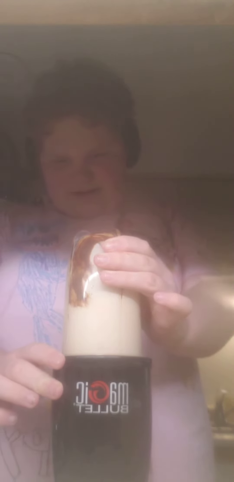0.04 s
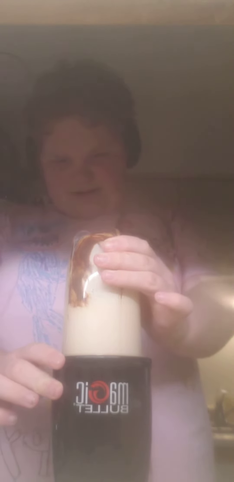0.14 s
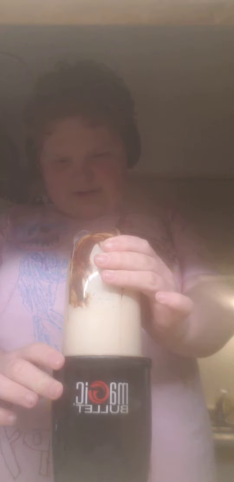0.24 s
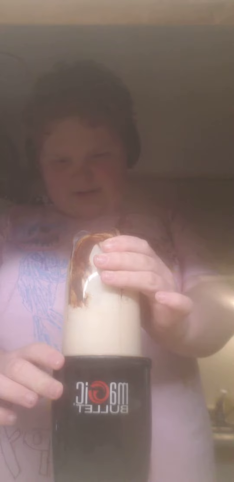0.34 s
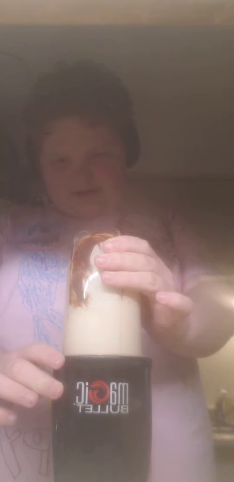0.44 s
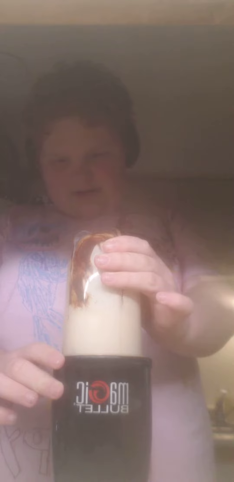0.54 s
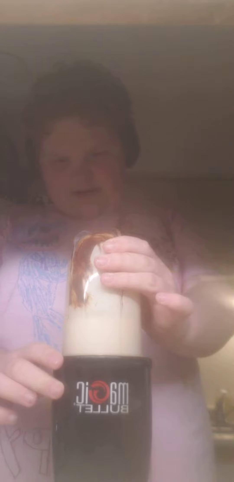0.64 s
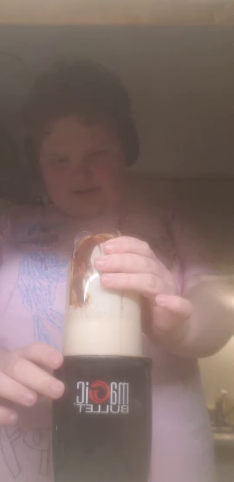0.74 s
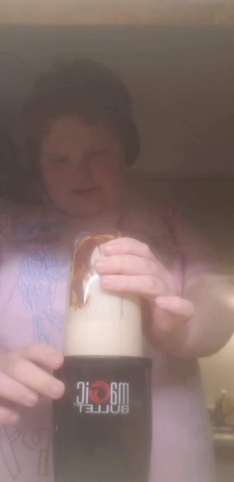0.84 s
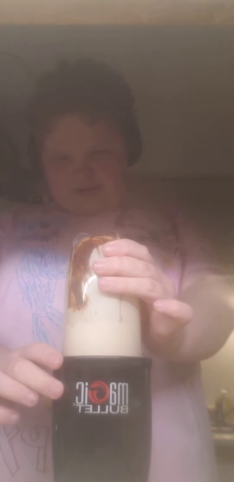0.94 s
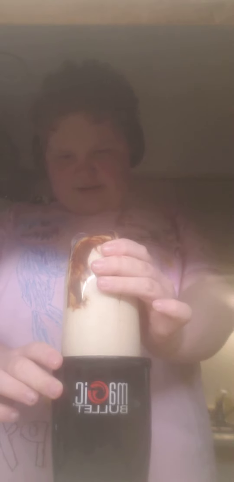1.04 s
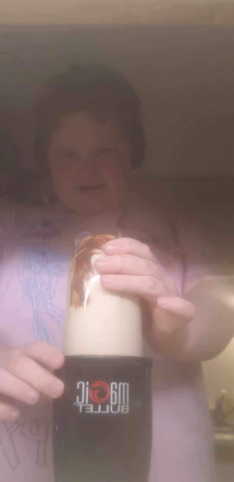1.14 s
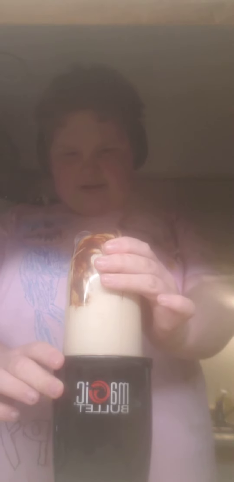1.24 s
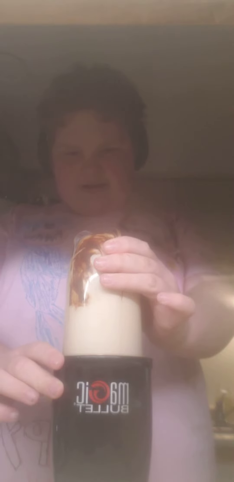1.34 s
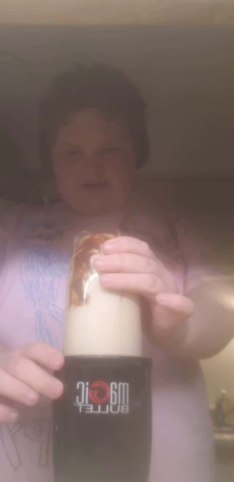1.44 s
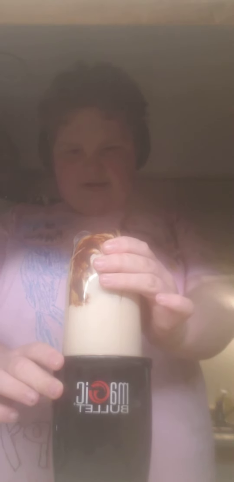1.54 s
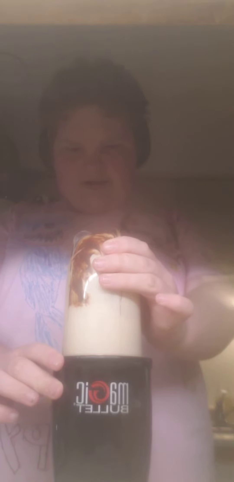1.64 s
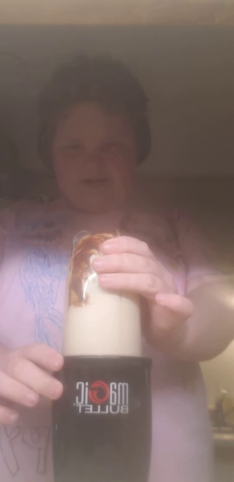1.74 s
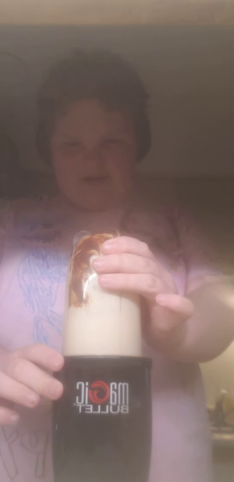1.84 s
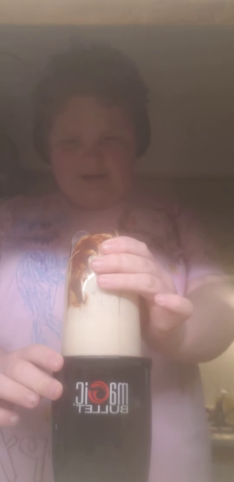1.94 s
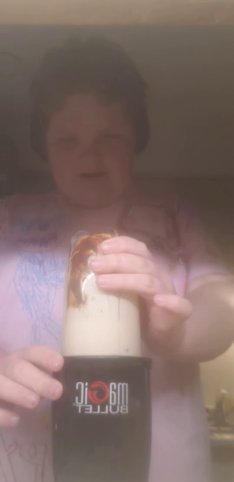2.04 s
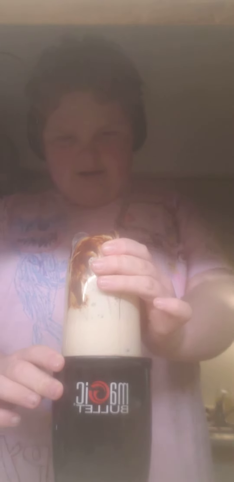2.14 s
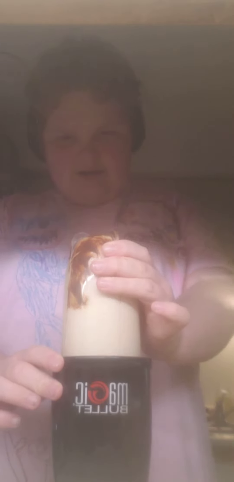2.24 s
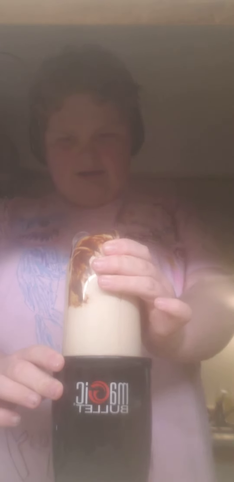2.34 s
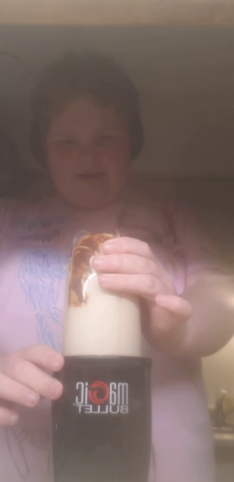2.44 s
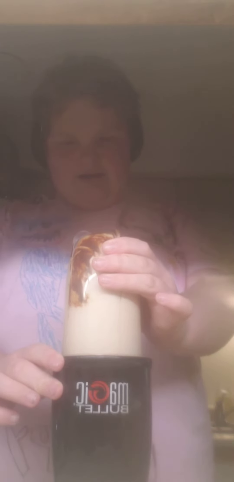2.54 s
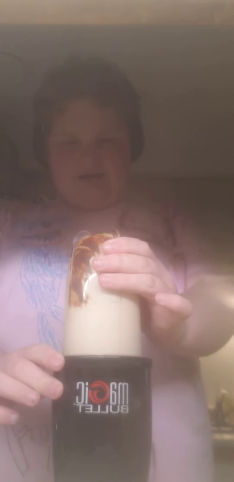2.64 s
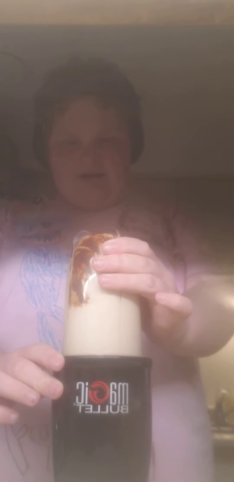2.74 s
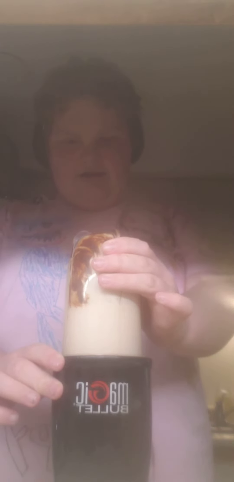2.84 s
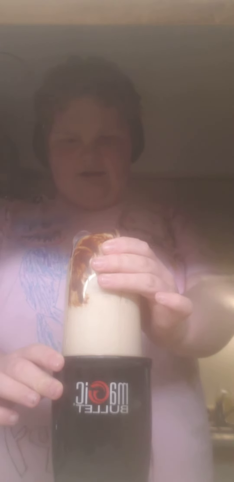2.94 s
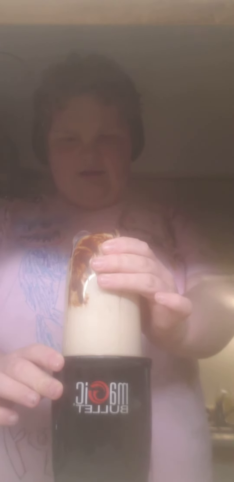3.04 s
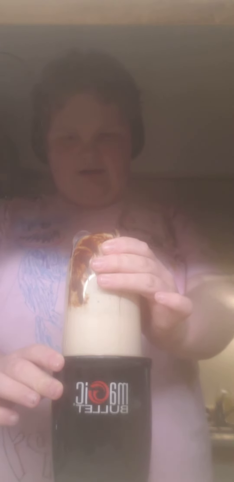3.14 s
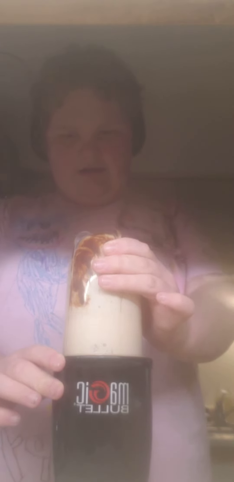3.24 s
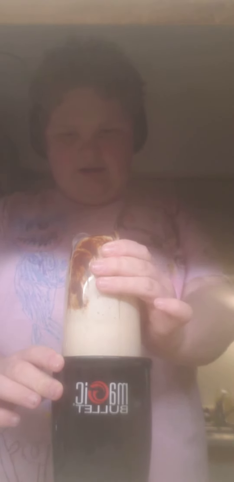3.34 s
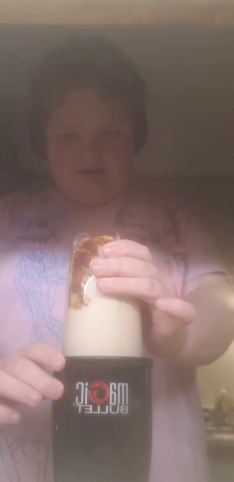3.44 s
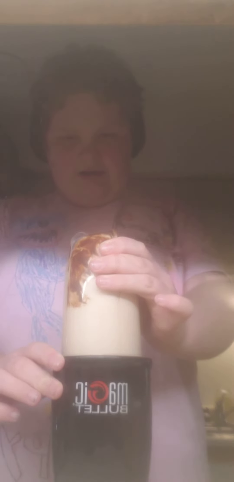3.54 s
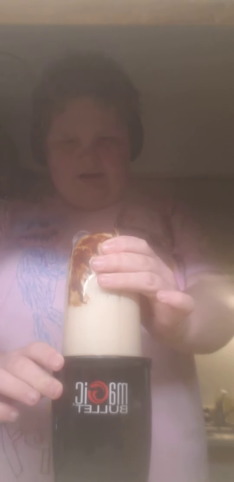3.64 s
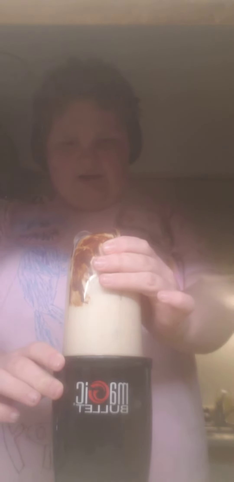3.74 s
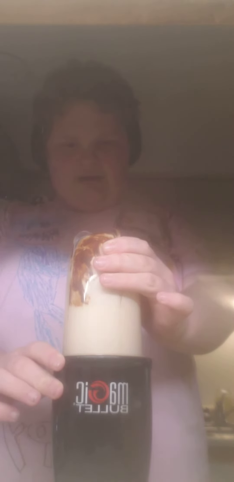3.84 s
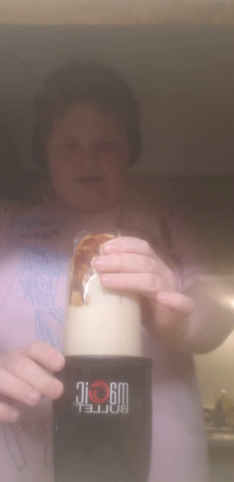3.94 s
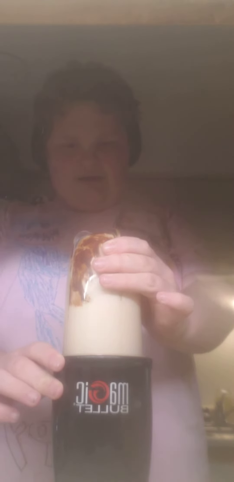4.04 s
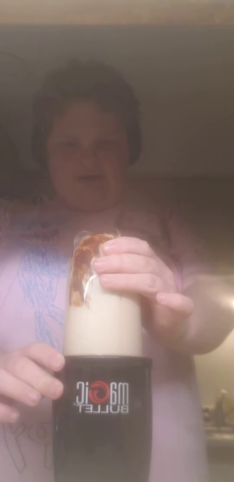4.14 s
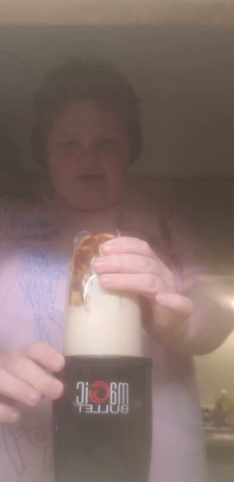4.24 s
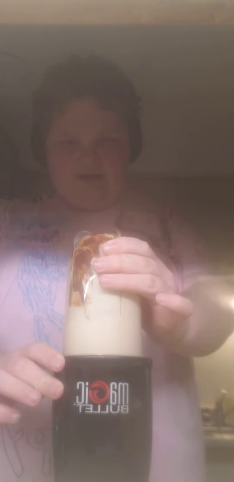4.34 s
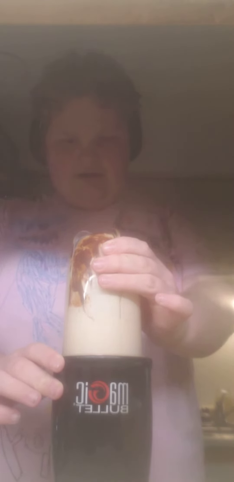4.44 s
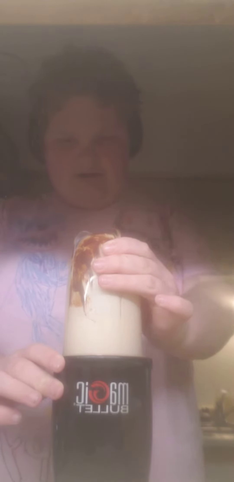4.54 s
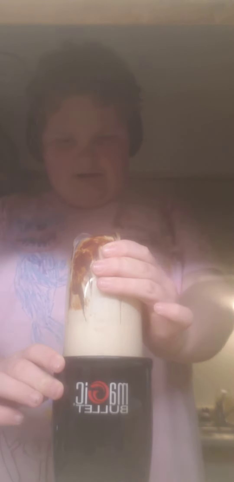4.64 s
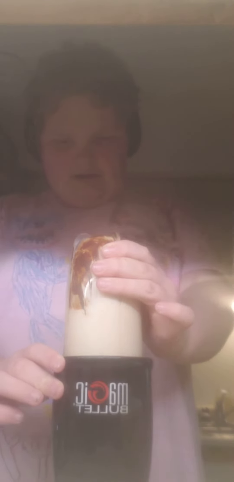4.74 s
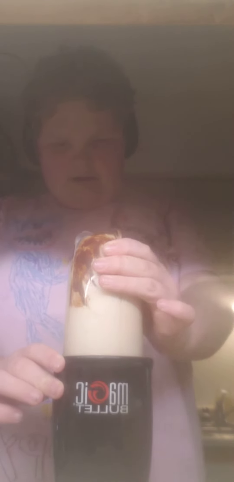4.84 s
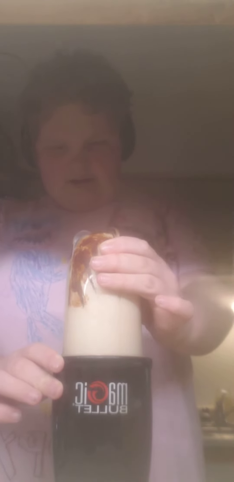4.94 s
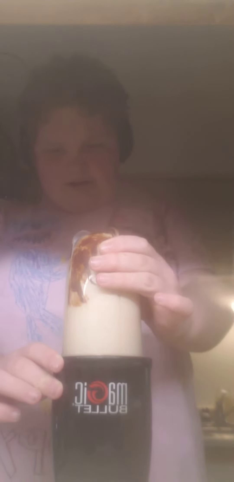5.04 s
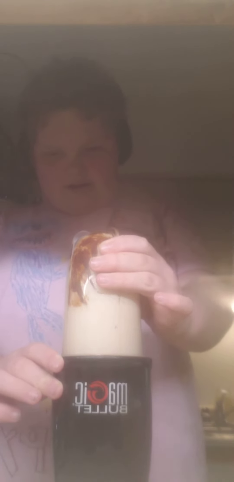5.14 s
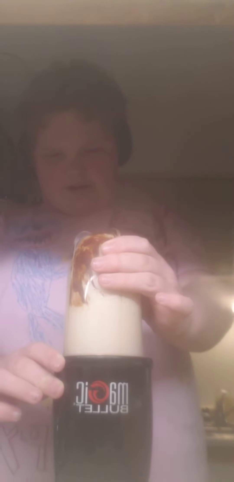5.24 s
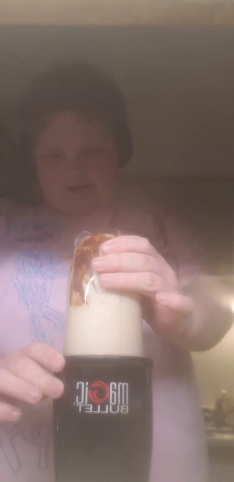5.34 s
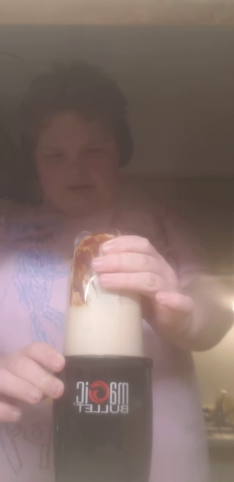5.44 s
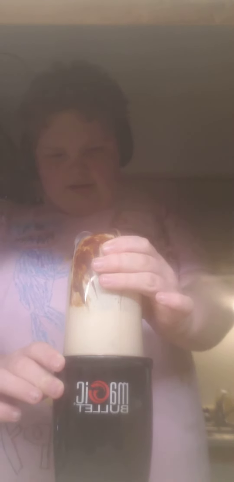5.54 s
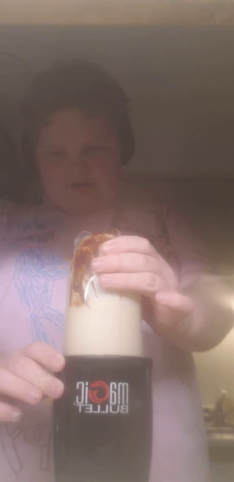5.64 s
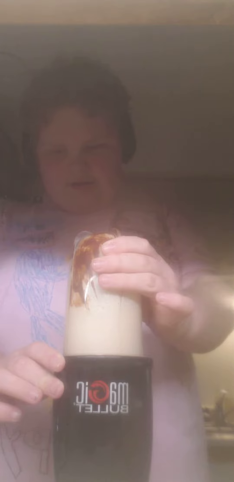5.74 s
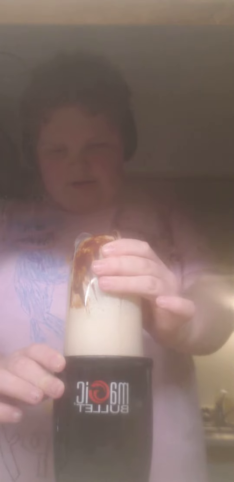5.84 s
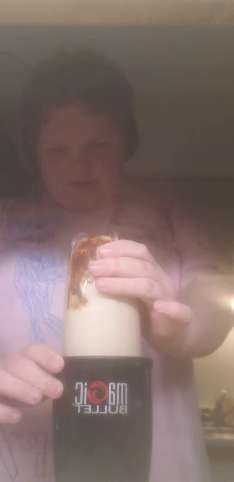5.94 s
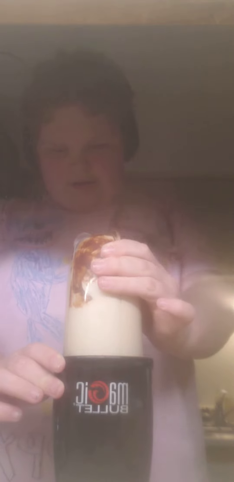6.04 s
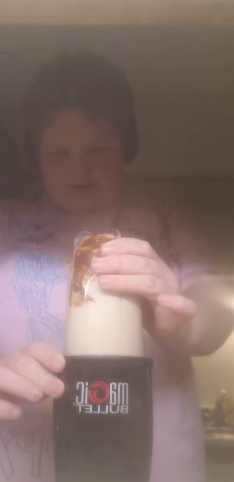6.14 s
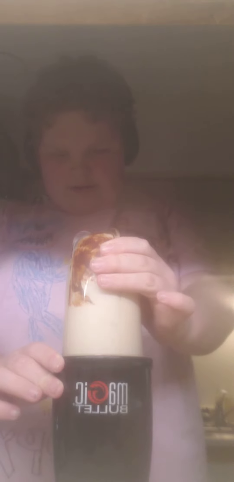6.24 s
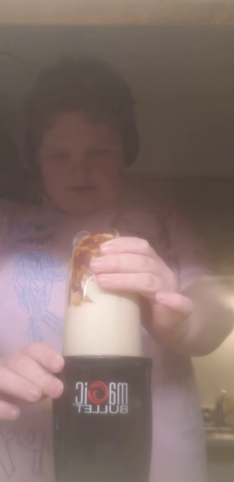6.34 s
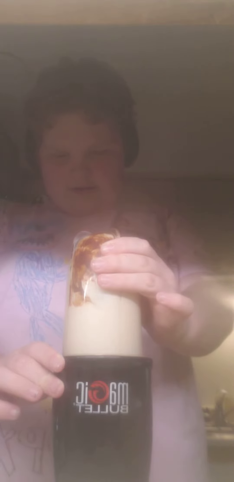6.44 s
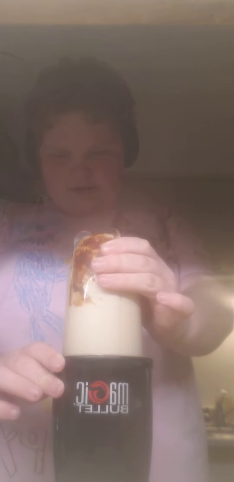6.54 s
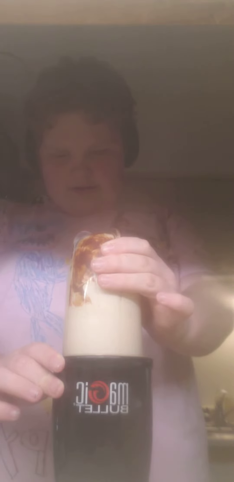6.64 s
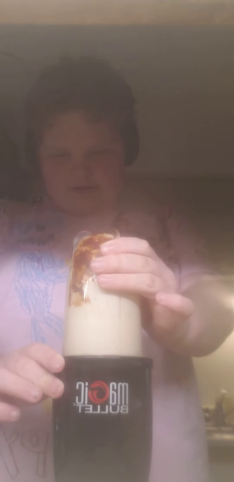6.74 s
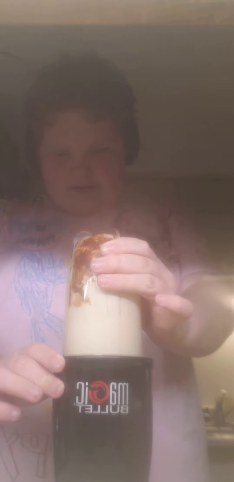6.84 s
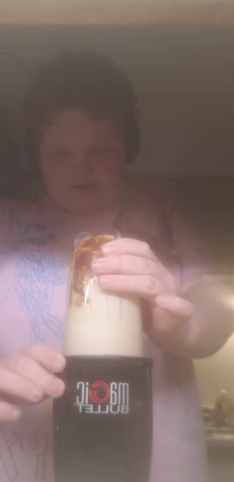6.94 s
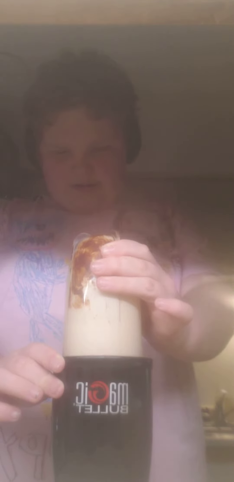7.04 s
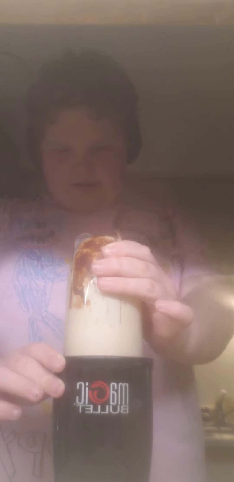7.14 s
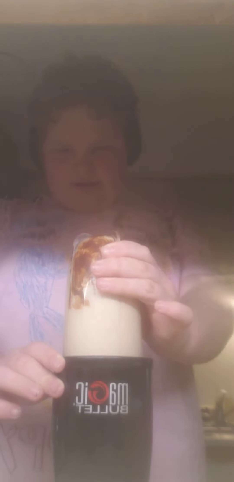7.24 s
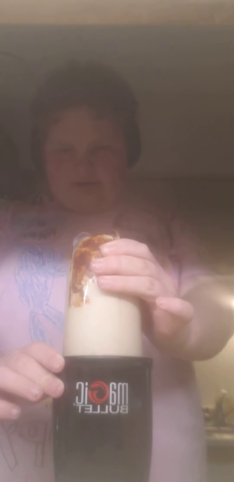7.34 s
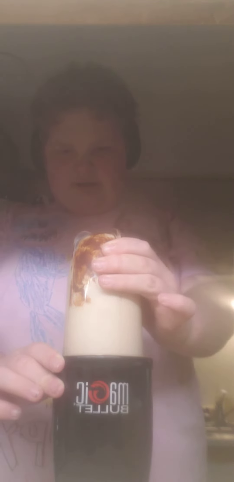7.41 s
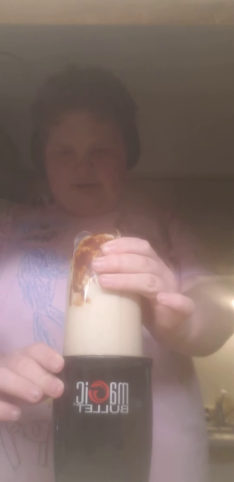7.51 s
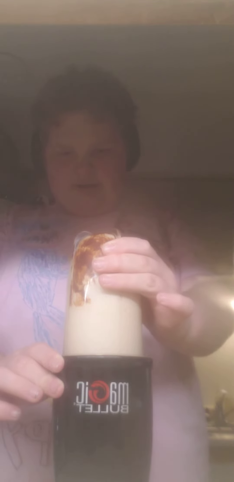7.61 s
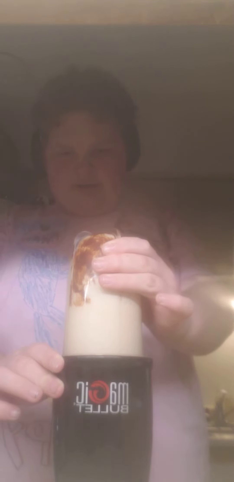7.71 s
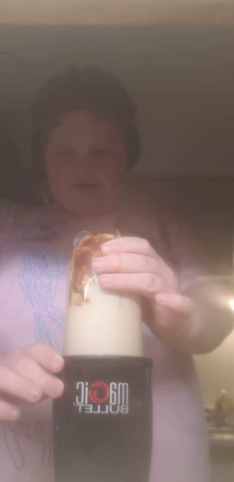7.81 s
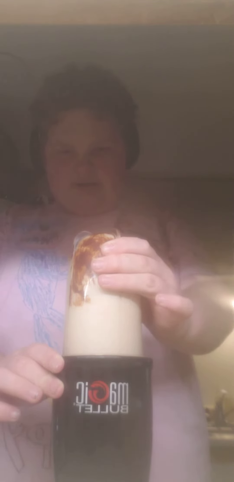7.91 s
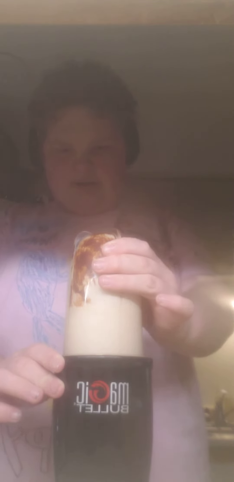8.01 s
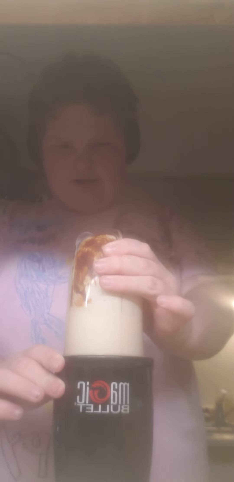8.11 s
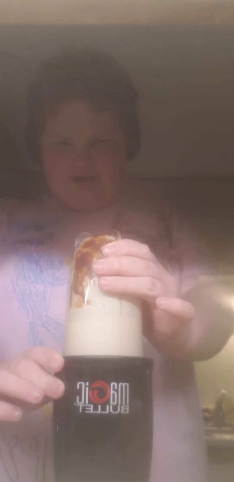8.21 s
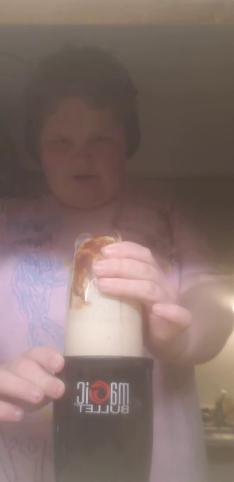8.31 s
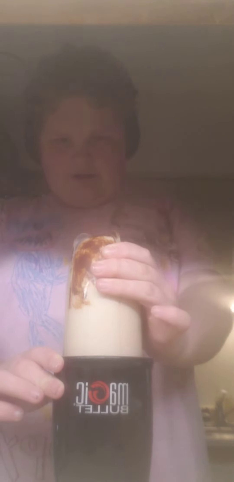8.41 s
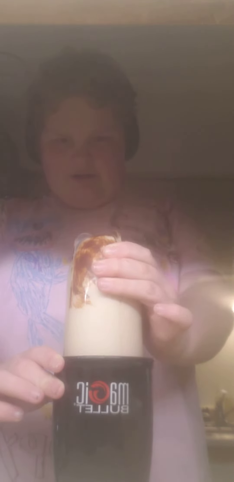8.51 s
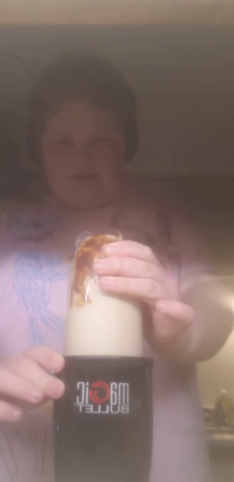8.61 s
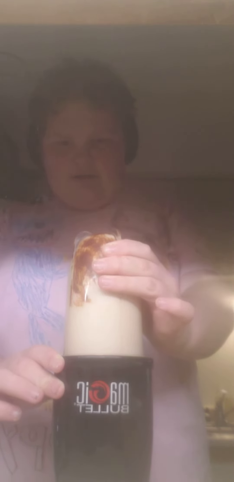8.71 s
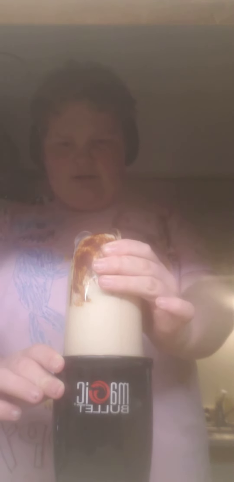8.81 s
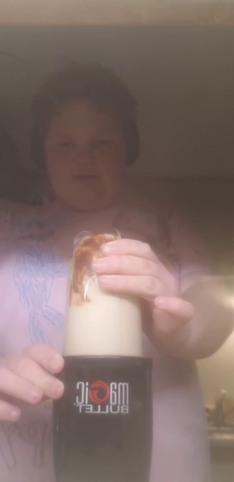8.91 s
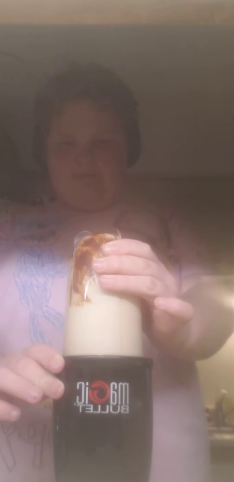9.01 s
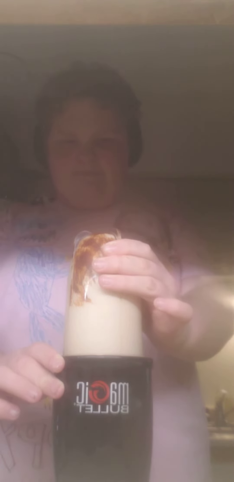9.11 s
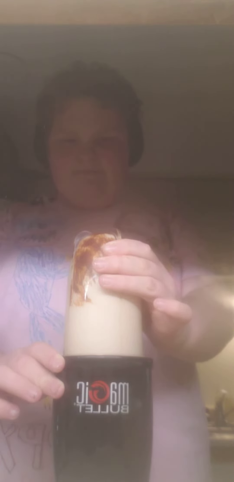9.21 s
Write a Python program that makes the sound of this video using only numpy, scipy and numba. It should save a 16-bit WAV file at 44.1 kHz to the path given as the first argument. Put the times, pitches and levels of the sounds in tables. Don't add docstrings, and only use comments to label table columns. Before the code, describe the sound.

A small blender crushes ice in milk, pulsed by hand, close to a phone in a lightly reflective kitchen. At 0 s a burst is already coasting: dense hard cracks, thinning by 0.6 s. A light plastic tick at 0.9 s precedes the next press at 1.0 s, a rough crunch with a strong counter thump and its loudest cracks near 1.5 s. Further bursts start at about 2.2, 3.4, 4.65, 5.9, 7.2 and 8.35 s. Each leaps up within a tenth of a second, a low motor growl briefly rising then falling under gritty grinding, with uneven mid-bright knocks and dull hollow cup thuds. Each decays over roughly a second into sparse clicks and faint fridge hum. The 7.2 s press is softer, barely thumping; the last has the loudest grinding, its cracks staying dense until about 9.1 s, then falling away to a few chips.

```python
import sys
import numpy as np
from scipy import signal
from scipy.fft import rfft, irfft
from scipy.io import wavfile
from scipy.ndimage import uniform_filter1d
from numba import njit

SR = 44100
rng = np.random.default_rng(int(sys.argv[2]) if len(sys.argv) > 2 else 0)


def natural_amplitude(level_db):
    exponent = np.asarray(level_db, float) / 20
    return 10 ** exponent


def unload_wav(signal):
    wavfile.write(
        sys.argv[1],
        SR,
        np.round(np.clip(np.atleast_2d(signal).T, -1, 1) * 32767).astype(np.int16),
    )


N = 408807

# pressed_s, released_s, top_speed_hz, coasting_loss_hz_per_s, unbalance_db
SPINS = [
    (-.3, -0.192, 166, 246, -40.5),
    (0.992, 1.089, 165.4, 239, -33.5),
    (2.212, 2.385, 185.3, 295, -38),
    (3.373, 3.553, 174, 227.4, -38),
    (4.657, 4.801, 186.3, 222, -36.5),
    (5.935, 6.031, 170, 234, -61.5),
    (7.197, 7.29, 170, 270, -53),
    (8.35, 8.596, 190, 287.4, -34.5),
]
# start_s, peak_db, ring_hz
TABS = [(0.8902, -29.5, 2366), (2.1835, -30.5, 2510), (3.3121, -29, 2250), (4.617, -30, 2270),
        (5.883, -28, 2275), (7.007, -32.5, 2194), (8.2381, -29, 2324)]
# centre_hz, width_hz, gain_db
CUP_MODES = [(220, 34, -9), (268.3, 18.8, -8), (426, 37.5, -2), (531, 100, -11.5), (669.3, 50, -4.5),
             (909, 70, -14.5)]
# freq_hz, density_db_per_hz
CRACK_SPECTRUM = [(410, -25.5), (700, -2.5), (986, -26), (1360, 4), (1570, -4.5), (2230, 0.5), (5260, 2),
                  (6180, 4), (7800, -24), (10100, -44), (17200, -120)]
# freq_hz, density_db_per_hz
SPARKLE_SPECTRUM = [(5000, -40), (7300, -11), (9300, -11), (10300, -5), (12200, -1), (15000, -4),
                    (17000, -12)]


def level(x, db):
    return x * natural_amplitude(db) / np.sqrt(np.mean(x ** 2))


def shape(points, size):
    hz, db = np.transpose(points)
    bins_hz = np.arange(size // 2 + 1) * SR / size
    return np.interp(np.log(bins_hz + 1), np.log(hz), db)


def colour(x, points):
    cepstrum = irfft(np.log(natural_amplitude(shape(points, size=1024))))
    cepstrum[1:512] *= 2
    cepstrum[513:] = 0
    return signal.fftconvolve(x, irfft(np.exp(rfft(cepstrum))))[:N]


@njit
def svf(x, hz, width):
    y, band, low = np.empty(len(x)), 0., 0.
    for i in range(len(x)):
        g, k = np.tan(np.pi * hz[i] / SR), width / hz[i]
        v = (band + g * (x[i] - low)) / (1 + g * (g + k))
        band, low, y[i] = 2 * v - band, low + 2 * g * v, k * v
    return y


def ring(x, modes):
    out = 0
    for k, (hz, width_hz, db) in enumerate(modes):
        out = out + (-1) ** k * natural_amplitude(db) * svf(x, np.full(N, 1. * hz), 1. * width_hz)
    return out


def fade(x, seconds):
    return signal.lfilter([1], [1, -np.exp(-1 / (max(seconds, 1e-4) * SR))], x)


def grit(rate_hz, spread_db, smear_s):
    hit = rng.random(N) < rate_hz / SR
    force_db = spread_db * np.minimum(rng.exponential(size=N), 4)
    chips = hit * natural_amplitude(force_db) / np.sqrt(rate_hz)
    return level(fade(chips, smear_s) * rng.standard_normal(N), 0)


def strike(at_s, hold_s, db, force, edge, rise_s):
    out, t = np.zeros(N), np.arange(SR // 6) / SR
    for start, hold, gain in zip(at_s, hold_s, natural_amplitude(db)):
        i = int(start * SR)
        piece = force[i:i + len(t)]
        form = (np.minimum(t / rise_s, 1) * np.exp(-(t / hold) ** edge))[:len(piece)]
        even = np.sqrt(np.sum(form ** 2) / np.sum((form * piece) ** 2))
        out[i:i + len(t)] += gain * even * form * piece
    return out


def kitchen():
    # freq_hz, rms_db
    hum_tones = [(60, -69), (120, -67), (183, -60.5)]
    # freq_hz, density_db_per_hz
    air_spectrum = [(30, -20), (110, -8.5), (300, -1), (450, -35), (1000, -34.5), (2200, -20.5),
                    (3500, -29), (16000, -49.5)]
    t = np.arange(N) / SR
    hum = sum(np.sqrt(2) * natural_amplitude(db) * np.sin(2 * np.pi * hz * t) for hz, db in hum_tones)
    return hum + np.array([level(colour(rng.standard_normal(N), air_spectrum), -63) for _ in range(2)])


def echoes(t60_s, db, top_hz):
    decay = np.exp(-np.log(1000) * np.arange(8192) / SR / t60_s)
    tail = rng.standard_normal((2, 8192)) * decay
    tail *= natural_amplitude(db) / np.sqrt(np.sum(tail ** 2, axis=1, keepdims=True))
    return signal.sosfilt(signal.butter(1, [800, top_hz], "band", fs=SR, output="sos"), tail)


def motor():
    t, shake = np.arange(N) / SR, 0
    for on_s, off_s, top_hz, loss, db in SPINS:
        spin_up = (t - on_s) / (off_s - on_s)
        coast = 1 - loss * (t - off_s) / top_hz
        speed = np.clip(np.minimum(spin_up, coast), 0, 1)
        turn = 2 * np.pi * np.cumsum(speed * top_hz) / SR
        shake = shake + natural_amplitude(db) * speed ** .7 * (np.sin(turn) + natural_amplitude(-9) * np.sin(2 * turn))
    wobble_db = 4 * level(uniform_filter1d(rng.standard_normal(N), size=1500), 0) + 1
    return ring(shake * natural_amplitude(wobble_db), [(115, 70, 0)])


def swirl(t):
    # freed_blade_grind_db, drop_out_s, sinking_db_per_s, counter_thump_db
    swirls = [
        (-31, 0.33, 78.5, -27.5),
        (-30.5, 1.51, 51.5, -21.5),
        (-31, 2.945, 66, -32),
        (-30, 4.086, 79, -34.5),
        (-29.5, 5.414, 60.5, -24),
        (-31.5, 6.43, 74, -31.5),
        (-31.5, 7.942, 72.5, -58),
        (-24.5, 9.12, 54.5, -27.5),
    ]
    freed_s, sag_db_per_s, rest_db = 0.19, 21, -77
    thump_s, hand_s = 0.03, 0.064
    pressed_s = np.transpose(SPINS)[0]
    pulse = np.maximum(np.searchsorted(pressed_s, t, side="right") - 1, 0)
    top_db, drop_s, sink, thump_db = np.array(swirls)[pulse].T
    since = t - pressed_s[pulse]
    sunk = np.maximum(t - drop_s, 0)
    grind_db = top_db - sag_db_per_s * np.abs(since - freed_s) - (sink - sag_db_per_s) * sunk
    boom_db = grind_db - 4.5 - 6 * (since - sunk)
    thump = natural_amplitude(thump_db) * since / thump_s * np.exp(1 - since / thump_s)
    hand = sum((t > start) * np.exp(-np.abs(t - start) / hand_s) for start, *_ in TABS)
    rumble = thump + natural_amplitude(-42.5 - .9 * sink * sunk) + natural_amplitude(-54) * hand
    return np.maximum(grind_db, rest_db), np.maximum(boom_db, rest_db - 10), rumble


def grinding(grind_db, boom_db):
    busy = np.clip((grind_db + 70) / 40, .25, 1)
    chunks = grit(1100 * busy, 2.3, .0015) + natural_amplitude(-6) * grit(250 * busy, 2.5, .0003)
    foam = natural_amplitude(-3) * grit(3000, 1.5, .001)
    thuds = grit(700, 1.2, .002)
    return np.array([natural_amplitude(grind_db) * chunks, natural_amplitude(grind_db - 26) * (chunks + foam), natural_amplitude(boom_db) * thuds])


def jams():
    # start_s, length_s, crack_db,
    # cup_boom_db
    jam_events = [(0.987, 0.069, -17, -28), (1.233, 0.016, -17.5, -34), (1.476, 0.055, -29, -41),
                  (2.222, 0.054, -18, -33), (2.456, 0.034, -19.5, -32), (3.38, 0.084, -17.5, -28.5),
                  (4.649, 0.0071, -37.5, -33.5), (4.663, 0.081, -17.5, -28), (4.948, 0.059, -28, -39),
                  (5.379, 0.031, -24, -34.5), (5.92, 0.12, -19, -33.5), (6.006, 0.05, -23.5, -39),
                  (6.073, 0.077, -18.5, -39.5), (7.192, 0.0066, -43, -35.5), (7.203, 0.059, -23, -34.5),
                  (8.35, 0.028, -14.5, -38)]
    at_s, length_s, roar_db, boom_db = np.transpose(jam_events)
    catching = grit(900, 2.5, .0015) + natural_amplitude(-5) * grit(200, 2.5, .0004)
    return np.array([strike(at_s, length_s, roar_db, catching, 5.6, 0.00044),
                     strike(at_s, length_s, roar_db - 20.5, catching, 14.0, 0.0015),
                     strike(at_s, length_s, boom_db, grit(700, 1.2, .002), 3.4, 0.0079)])


def bumps():
    # start_s, boom_db
    bump_events = [
        (4.3, -48.5),
        (5.7, -47),
        (6.655, -52.5),
    ]
    at_s, db = np.transpose(bump_events)
    return strike(at_s, np.full(len(at_s), .014), db, grit(700, 1.2, .002), 1.2, .005)


def knock_list():
    # start_s, peak_db, ring_hz, treble_over_crack_db,
    # boom_over_crack_db
    ice_knocks = [(0.0223, -4.5, 2000, -32, -14.5), (0.0523, -8.5, 2300, -25.5, -9.5),
                  (0.0905, -2.5, 2250, -34, -16), (0.1366, -1.5, 1954, -32.5, -19.5),
                  (0.1135, -24.5, 4800, -13, -22), (0.177, -10, 2170, -22, -14), (0.311, -11, 2320, -14, -17),
                  (0.242, -7, 2630, -15, -11.5), (0.2564, -2, 4520, -14, -22.5),
                  (0.2842, -17, 2090, -26, -11.5), (0.299, 0, 2280, -21.5, -15.5),
                  (0.337, -11, 3310, -28.5, -20), (0.3485, -15, 2310, -30.5, -20),
                  (0.3706, -19, 2090, -27.5, -19.5), (0.394, -23.5, 5160, -19.5, -18),
                  (0.416, -15, 4950, -30, -16.5), (0.459, -36.5, 4350, -20.5, -15),
                  (0.4703, -34.5, 2260, -32.5, -5.5), (0.4953, -39, 2270, -17.5, -11),
                  (0.511, -26, 2280, -28.5, -10), (0.605, -24, 2000, -30, -20), (0.634, -39, 3840, -13, -7.5),
                  (0.9755, -27, 2670, -18.5, -6.5), (0.9877, 0.5, 2378, -20, -17),
                (0.9951, -12, 2153, -15.5, -15), (1.0723, -12, 2270, -25.5, -20),
                (1.1144, -15, 2376, -26, -10), (1.129, -19.5, 2150, -19, -3.5),
                (1.1691, -11, 2710, -25, -10), (1.192, -5.5, 2113, -25, -20),
                (1.2254, 1.5, 2110, -27.5, -16), (1.2697, -4, 2210, -20, -18.5),
                (1.2903, -18, 2636, -24, -23), (1.311, -18, 2170, -7.5, -11.5),
                (1.3236, -9, 2003, -20.5, -30), (1.743, -21.5, 2880, -16.5, -18),
                (1.3902, -6.5, 2204, -24, -15.5), (1.44, -6.5, 1805, -29, -14.5),
                (1.461, -2, 2225, -27, -9.5), (1.4708, 5, 2210, -23.5, -21),
                (1.4926, 6.5, 2220, -23, -26.5), (1.5198, -5, 2233, -26.5, -24),
                (1.588, -27, 4280, -21, -20.5), (1.6312, -12.5, 2564, -24.5, -15.5),
                (1.6819, -13.5, 2310, -19, -15), (1.7017, -10.5, 4910, -18, -16.5),
                (1.7277, -17.5, 1836, -21.5, -16.5), (1.758, -24.5, 2336, -10, -22.5),
                (1.789, -21.5, 2074, -29.5, -22), (1.8896, -36, 2290, -24.5, -17),
                (1.9026, -27, 2850, -27, -12.5), (2.0504, -40, 2750, -36.5, -28.5),
                  (2.2204, -12, 1812, -20.5, -13.5), (2.2228, -5, 3220, -23.5, -16.5),
                (2.23, -6, 2660, -21, -22), (2.2838, -9, 3160, -20, -22.5), (2.3015, -10, 2170, -22, -15.5),
                (2.3092, -10, 2750, -34.5, -13.5), (2.338, -9.5, 1877, -23.5, -12),
                (2.4594, -2, 2260, -24.5, -16), (2.5048, -10.5, 2020, -27.5, -19),
                (2.5362, -7.5, 2170, -23.5, -30.5), (2.5791, -10.5, 1770, -29.5, -12),
                (2.943, -16, 1897, -18, -18), (2.641, -2, 2320, -29.5, -13), (2.6673, 0.5, 3195, -25, -17),
                (2.696, -7.5, 2180, -35.5, -11), (2.756, -17, 4600, -30.5, -31),
                (2.8197, -5, 2680, -28.5, -5), (2.8404, 0.5, 2293, -24, -21.5),
                (2.8801, -12, 2033, -17, -21.5), (2.9001, -21.5, 2060, -24.5, -13),
                (2.9178, -8, 2410, -17, -14.5), (2.98, -19.5, 2750, -25.5, -19.5),
                (3.012, -18, 2420, -27, -16.5), (3.028, -16, 4070, -21, -8),
                (3.0995, -27.5, 4600, -15.5, -12.5), (3.1405, -23.5, 2720, -23.5, -25),
                (3.1658, -21, 2257, -37, -14.5), (3.1895, -29.5, 2240, -39.5, -14),
                (3.2474, -25.5, 3850, -11, -35),
                  (3.374, -10, 2284, -31, -15), (3.3752, -5, 3216, -17.5, -16), (3.3811, -5, 2220, -12, -14),
                (3.4442, -4, 2230, -20.5, -26), (3.5611, -18.5, 1405, -24, -14),
                (3.5846, -20.5, 1776, -27, -8.5), (3.6277, -10.5, 1923, -19, -7),
                (3.714, -13, 5100, -28.5, -22.5), (3.7161, -11, 2775, -22.5, -19.5),
                (3.761, -8, 1872, -29, -17.5), (3.8035, -6, 2240, -29, -15.5), (3.833, -18, 1863, -25, -19),
                (3.842, -23.5, 2160, -17, -16), (3.732, -15, 5240, -12.5, -20.5),
                (3.8792, -5.5, 1816, -27.5, -14), (3.9222, -8, 1800, -27.5, -10.5),
                (3.9343, -2, 2227, -31.5, -17.5), (3.9818, -10, 2300, -25, -19.5),
                (3.9994, 0.5, 1370, -20, -14.5), (4.023, -1, 2400, -19.5, -23.5),
                (4.0588, -15, 2200, -19, -17.5), (4.0855, -15.5, 2790, -14.5, -18),
                (4.1146, -24.5, 4990, -4, -23), (4.124, -26, 1800, -20.5, -20.5),
                (4.1514, -18, 2200, -23, -15.5), (4.173, -20.5, 1396, -20, -11),
                (4.188, -15, 2295, -26.5, -12.5), (4.2546, -24, 2100, -32, -11),
                  (4.6601, -17, 2560, -16, 4.5), (4.914, -13.5, 2290, -22, -16),
                (4.6712, -13.5, 2600, -19, -14), (4.6802, -5.5, 2343, -17, -16.5),
                (4.6954, -3, 2740, -23, -22), (4.8303, -18.5, 2500, -28.5, -17),
                (4.844, -11, 2456, -28.5, -8.5), (4.8732, -8.5, 2000, -22, -12),
                (4.997, -10.5, 2306, -27, -10.5), (4.9652, -10, 2103, -29, -18.5),
                (4.9748, -6.5, 2310, -25, -12), (5.0653, -7, 1348, -32.5, -14.5),
                (5.0989, -8, 2270, -33.5, -13), (5.1388, -17.5, 2144, -27.5, -5),
                (5.179, -15.5, 1934, -27.5, -10), (5.2332, -9.5, 2185, -27, -22),
                (5.241, -4, 4740, -23.5, -23), (5.396, -14.5, 1995, -15.5, -21.5),
                (5.2889, -2.5, 2250, -27, -12.5), (5.368, -5.5, 2644, -25.5, -13.5),
                (5.3744, -12, 1823, -23.5, -14), (5.4803, -28, 2250, -20.5, -26.5),
                (5.6175, -20, 2116, -27, -14.5),
                  (5.9234, -6.5, 2270, -23, -3.5), (5.9305, -8.5, 2360, -23, -9.5),
                (5.9368, 0.5, 2454, -23, -30), (5.9946, -2.5, 2250, -17, -16),
                (6.0206, 4, 2530, -23.5, -13), (6.0886, -1, 2780, -18, -26),
                (6.111, -6.5, 2000, -17.5, -21), (6.1666, -10, 1890, -16, -16),
                (6.2011, -4, 2960, -20.5, -24), (6.1962, 2, 2567, -23, -20),
                (6.3128, -20.5, 4830, -4.5, -24), (6.3504, -7, 2656, -16.5, -22.5),
                (6.3527, -5.5, 2796, -19.5, -27.5), (6.4161, -28.5, 2200, -25.5, -23),
                (6.4297, -22.5, 2793, -19, -11.5), (6.468, -7, 2685, -25.5, -20),
                (6.568, -22, 2790, -19, -31), (6.523, -5, 2280, -20, -24),
                (6.5868, -25.5, 2520, -28, -21.5), (6.485, -14.5, 2280, -24.5, -20.5),
                (6.6673, -28, 2323, -35.5, -14.5), (6.756, -27.5, 4800, -22, -31.5),
                (6.8116, -37, 2250, -21.5, -15.5),
                  (7.2011, -19, 2133, -18.5, -15.5), (7.208, -7, 2290, -22, -17),
                (7.2164, -6.5, 2980, -26, -16.5), (7.3054, -11, 2190, -24.5, -14.5),
                (7.627, -21, 4800, -11.5, -13.5), (7.3369, -18.5, 2163, -21.5, -21.5),
                (7.422, -26.5, 2106, -28, -12), (7.442, -14, 2117, -23, -20.5),
                (7.4623, -9.5, 2170, -21.5, -18), (7.4993, -16, 2770, -19.5, -25.5),
                (7.5188, -12.5, 2110, -26.5, -23.5), (7.5347, -7.5, 2128, -31, -20),
                (7.6184, -12.5, 2150, -31, -16.5), (7.6414, -5, 2225, -35.5, -14.5),
                (7.6668, -16.5, 2030, -18, -21.5), (7.6854, -8.5, 3320, -11, -25.5),
                (7.7241, -33, 2190, -23.5, -22), (7.7362, -17, 2110, -32, -32.5),
                (7.804, -2.5, 2150, -21.5, -20), (7.845, -11, 2313, -19, -17),
                (7.8526, -1.5, 2770, -34.5, -22), (7.9042, -15, 2766, -30.5, -27.5),
                (7.96, -22.5, 2090, -21.5, -20.5), (8.0047, -22, 4530, -25.5, -31.5),
                (8.0707, -28, 2308, -24.5, -14.5),
                  (8.3429, -10, 3507, -23.5, -12.5), (8.3489, -7, 2120, -17.5, -10),
                (8.652, -7, 2300, -29.5, -22), (8.4479, -15.5, 2110, -30, -19.5),
                (8.933, -11.5, 2540, -31.5, -17.5), (8.54, -4, 2100, -33, -14),
                (8.5684, 0.5, 1886, -32, -17.5), (8.5899, 1, 2080, -34, -19), (8.629, -2, 2474, -31, -16),
                (8.6389, -5.5, 2220, -27.5, -23.5), (8.713, -11, 2310, -32, -11.5),
                (8.7622, -10.5, 2760, -33, -15.5), (8.905, -5.5, 2750, -24, -27),
                (8.7793, -4.5, 2774, -25.5, -18), (8.7991, -6, 1808, -20.5, -19),
                (8.8157, -8.5, 3320, -36, -11.5), (9.042, -12.5, 3220, -11.5, -16.5),
                (8.855, -3.5, 2160, -23.5, -14.5), (8.877, 3, 2520, -24, -17.5),
                (8.9129, -1, 3220, -28.5, -18), (8.973, -15, 2195, -28, -15.5),
                (9.0244, -10.5, 2483, -22, -12), (9.1179, -5.5, 2220, -25.5, -11),
                (9.2325, -22, 2510, -21.5, -22.5)]
    # start_s, peak_db, ring_hz
    switch_clicks = [
        (3.365, -24.5, 2270),
        (5.908, -26.5, 2280),
        (8.334, -23, 1985),
    ]
    # start_s, peak_db, ring_hz
    lone_chips = [(0.1885, -13.5, 2150), (0.2087, -15, 2290), (1.862, -37, 2240), (1.929, -34, 4510),
                  (4.2996, -38.5, 1780), (4.348, -43.5, 4130), (4.3938, -41.5, 5150), (4.4656, -47.5, 2280),
                  (5.5253, -25.5, 1834), (5.584, -23, 4730), (6.884, -43, 2770), (8.2, -32.5, 2150),
                  (5.03, -15.5, 2300), (5.643, -27, 4500), (6.4627, -11.5, 2000), (9.167, -22.5, 2200),
                  (9.184, -20, 2200)]
    cubes = ice_knocks
    rows = [tuple(row) for row in cubes]
    for events, treble_db in ((TABS, -1.5), (switch_clicks, -9.5), (lone_chips, -17.5)):
        rows += [(*row, treble_db, -13) for row in events]
    return np.transpose(sorted(rows))


def knocks(at_s, peak_db, ring_hz, treble_db, boom_db):
    rasp_s = 0.0044 * (1 + 1.01 * rng.random(len(at_s)))
    splinter = grit(3000, 1.6, 0.00044)
    opening = (at_s * SR).astype(int)[:, None] + np.arange(80)
    splinter[opening] += 1.1 * np.hanning(80) * np.sin(2 * np.pi * ring_hz[:, None] * opening / SR)
    return np.array([strike(at_s, rasp_s, peak_db - 12.5, splinter, 1.1, 0.00076),
                     strike(at_s, rasp_s, peak_db + treble_db - 14.5, grit(4000, 1.5, .0005), 0.68, 0.00072),
                     strike(at_s, rasp_s, peak_db + boom_db - 5, splinter, 0.98, 0.00086)])


def bodies(crack, sparkle, boom, rumble, cube_hz, chip_hz):
    # centre_hz, width_hz, gain_db
    wall_modes = [(1440, 65, -15), (1820, 1500, 15), (2270, 330, 15), (2750, 560, 11), (3320, 600, 17.5)]
    # centre_hz, width_hz, gain_db
    counter_modes = [(64, 16, 10), (115, 38, 4)]
    paths = [(-1.5, crack, lambda x: colour(x, CRACK_SPECTRUM)),
             (-11, crack, lambda x: ring(x, wall_modes)),
             (-6.5, crack, lambda x: svf(x, cube_hz, 450.0)),
             (-3.5, crack, lambda x: svf(x, chip_hz, 1600.0)),
             (-1, sparkle, lambda x: colour(x, SPARKLE_SPECTRUM)),
             (6, boom, lambda x: ring(x, CUP_MODES)),
             (1, rumble, lambda x: ring(ring(x, counter_modes), [(83, 270, 0)]))]
    probe = rng.standard_normal(2 ** 15)
    return sum(natural_amplitude(db) * path(force) / np.std(path(probe)) for db, force, path in paths)


def sideways(crack, sparkle, boom):
    def scatter(force, size):
        return uniform_filter1d(np.abs(force), size=size) * rng.standard_normal(N)

    crack_around = scatter(crack, 8)
    splinters = level(ring(colour(crack_around, CRACK_SPECTRUM), [(2600, 4000, 0)]), 0)
    treble = level(colour(scatter(sparkle, 8), SPARKLE_SPECTRUM), -12)
    cup = level(ring(scatter(boom, 40), CUP_MODES), -21)
    wall_rock = level(ring(crack_around, [(1150, 300, 0)]), -6)
    return splinters + treble + cup + wall_rock


def ice():
    t = np.arange(N) / SR
    grind_db, boom_db, rumble = swirl(t)
    events = knock_list()
    crack, sparkle, boom = knocks(*events) + jams() + grinding(grind_db, boom_db)
    boom = boom + bumps()
    at_s, _, ring_hz, _, _ = events
    cube_hz = ring_hz[np.maximum(np.searchsorted(at_s, t, side="right") - 1, 0)]
    chip_hz = np.repeat(1100 * 4.91 ** rng.random(N // 500 + 1), 500)[:N]
    ahead = bodies(crack, sparkle, boom, rumble * grit(210, 0.33, 0.034), cube_hz, chip_hz)
    return ahead, natural_amplitude(-6) * np.std(ahead) * sideways(crack, sparkle, boom)


def scene():
    # freq_hz, left_over_right_db
    left_over_right = [(60, -.5), (250, -3), (500, 1), (1000, -1), (2200, -2), (4400, 1), (7000, 0),
                       (10000, -7), (15000, -11)]
    path = echoes(.045, -7.5, 20000) + echoes(.22, -14, 14000)
    path[0, 2] += 1
    path[1, 0] += 1
    ahead, around = ice()
    ahead = ahead + motor()
    ports = []
    for response, side in zip(path, (1, -1)):
        port = signal.fftconvolve(ahead + side * around, response)[:N]
        ports.append(colour(port, [(hz, side * db / 2) for hz, db in left_over_right]))
    return np.array(ports) + kitchen()


def band_limit(x):
    return signal.sosfilt(signal.butter(12, 16970, fs=SR, output="sos"), x)


def record(dry):
    rounded = np.tanh(1.25 * dry) / 1.25
    top = signal.ellip(8, .2, 70, 15650, fs=SR, output="sos")
    bottom = signal.butter(2, 38, "high", fs=SR, output="sos")
    mix = signal.sosfilt(np.vstack((top, bottom)), rounded)
    return band_limit(mix)


dry = scene()
out = record(dry)
unload_wav(out)
```